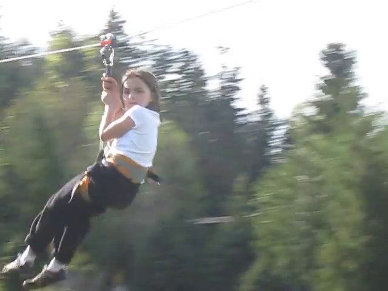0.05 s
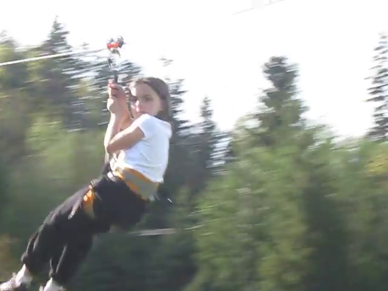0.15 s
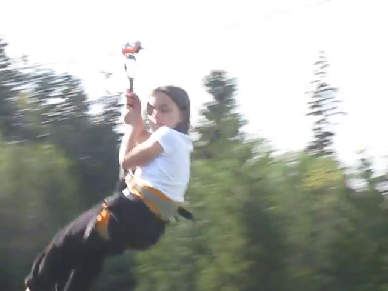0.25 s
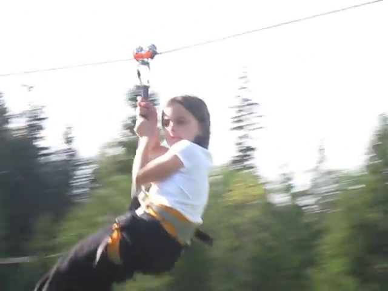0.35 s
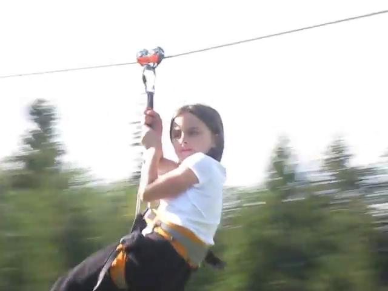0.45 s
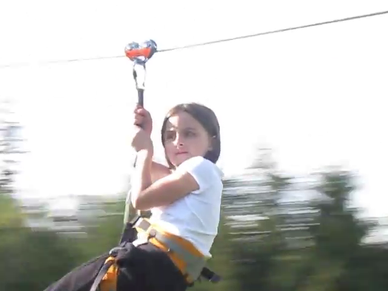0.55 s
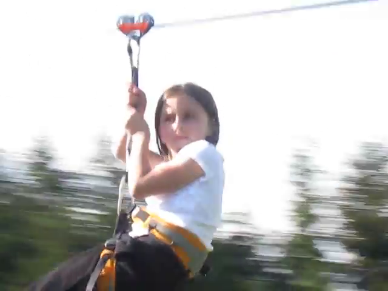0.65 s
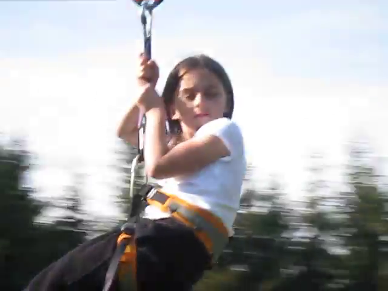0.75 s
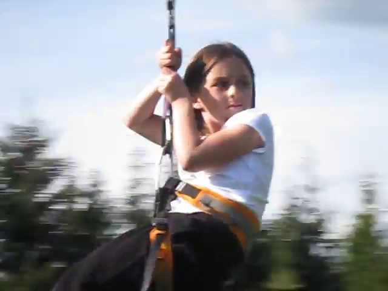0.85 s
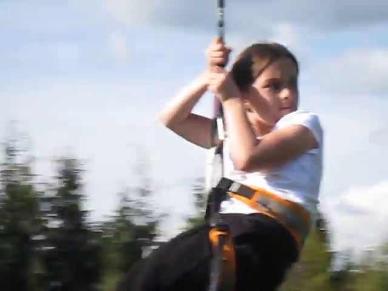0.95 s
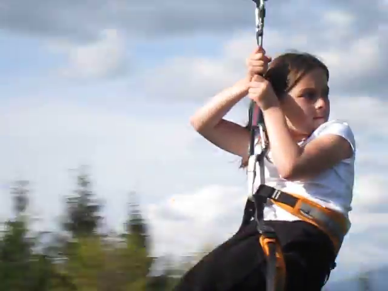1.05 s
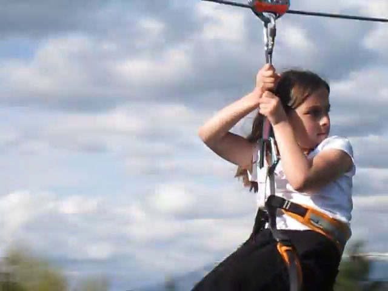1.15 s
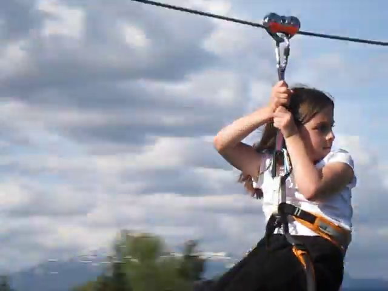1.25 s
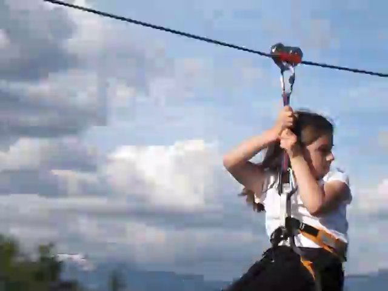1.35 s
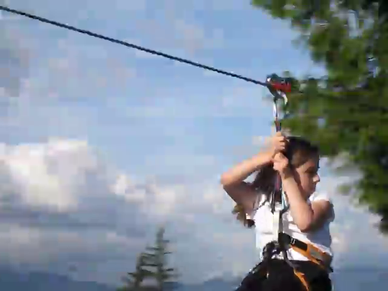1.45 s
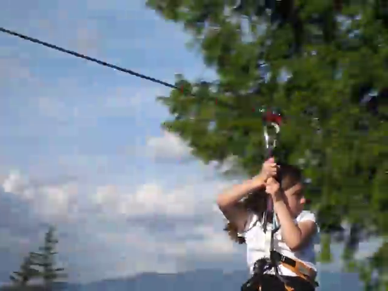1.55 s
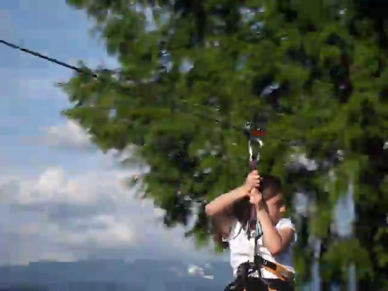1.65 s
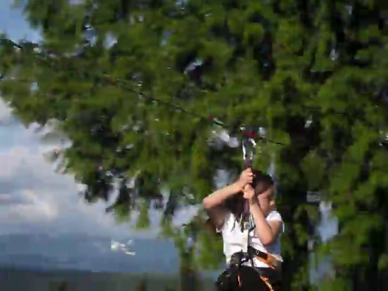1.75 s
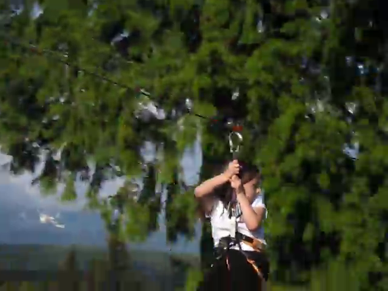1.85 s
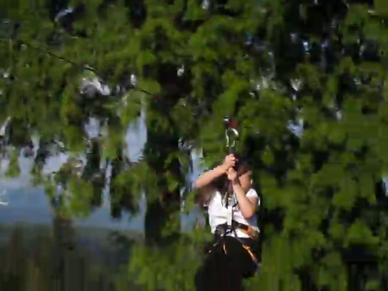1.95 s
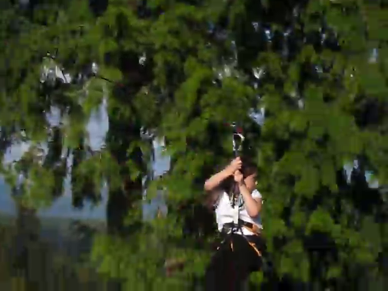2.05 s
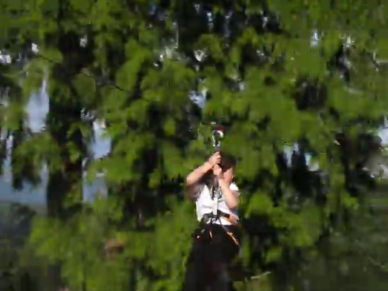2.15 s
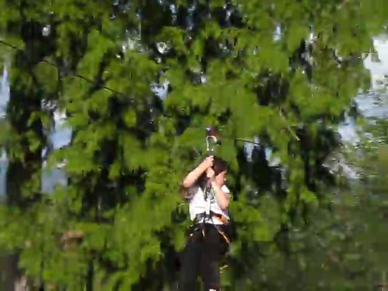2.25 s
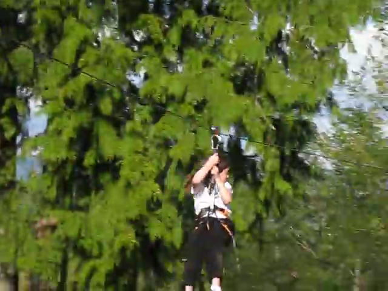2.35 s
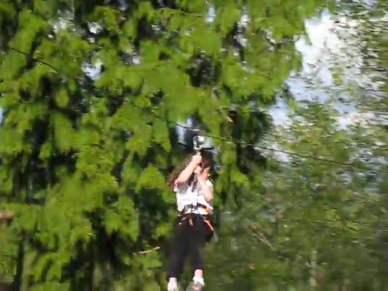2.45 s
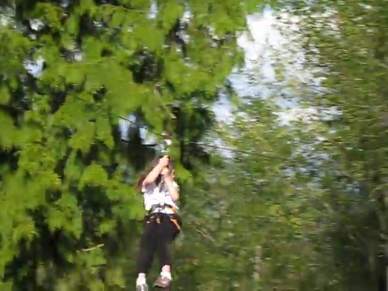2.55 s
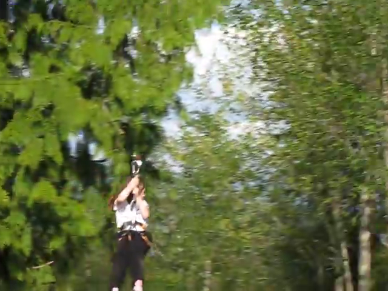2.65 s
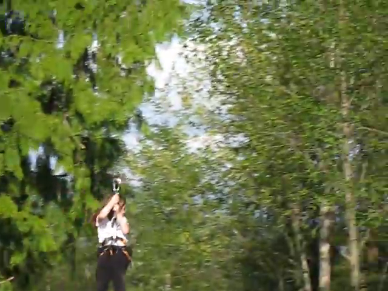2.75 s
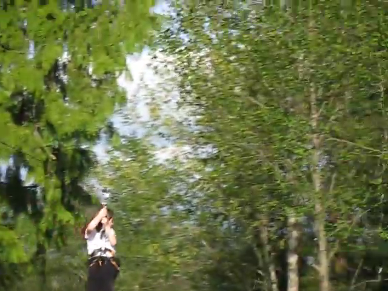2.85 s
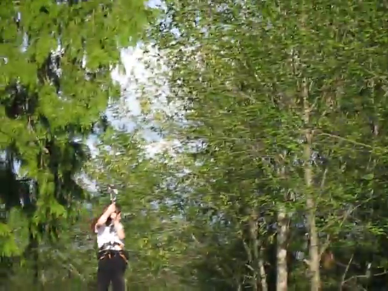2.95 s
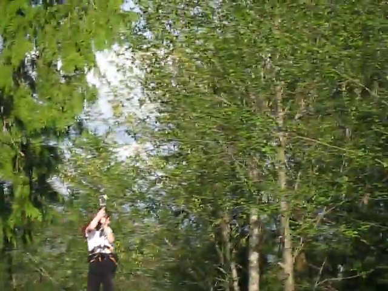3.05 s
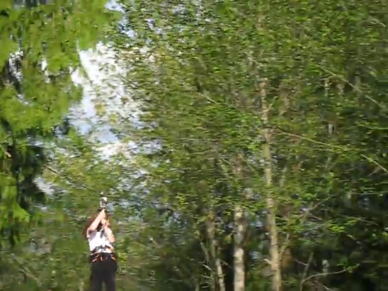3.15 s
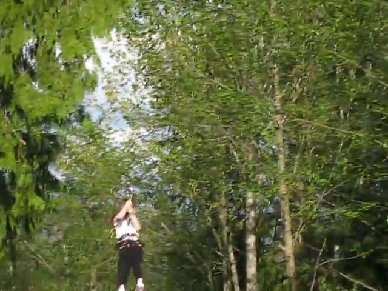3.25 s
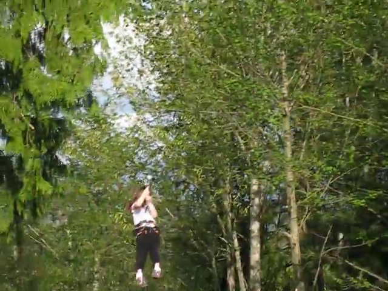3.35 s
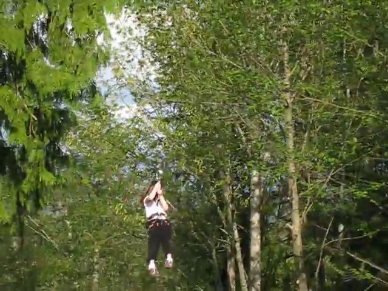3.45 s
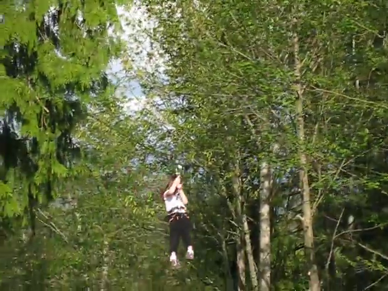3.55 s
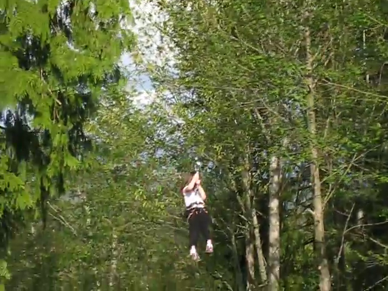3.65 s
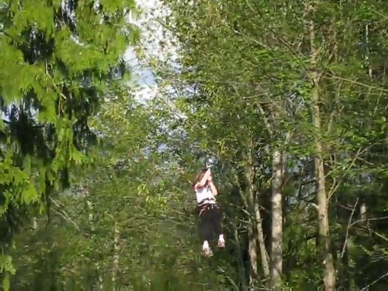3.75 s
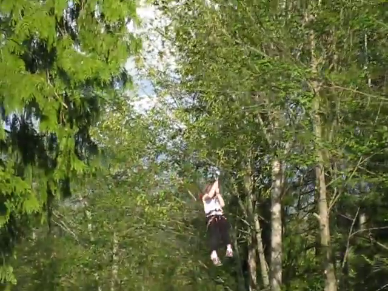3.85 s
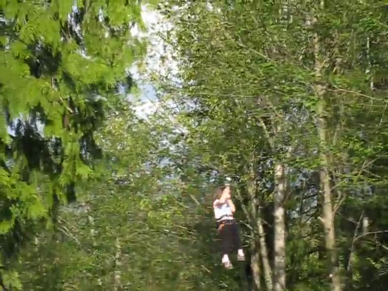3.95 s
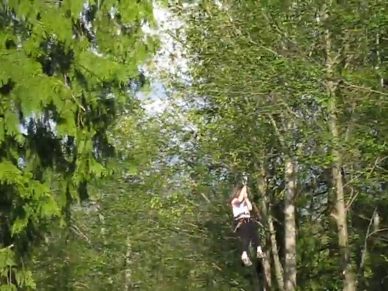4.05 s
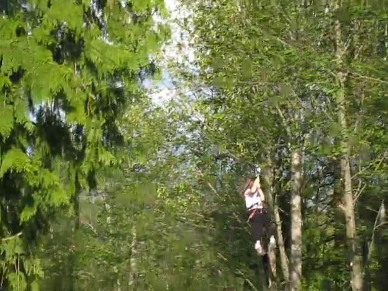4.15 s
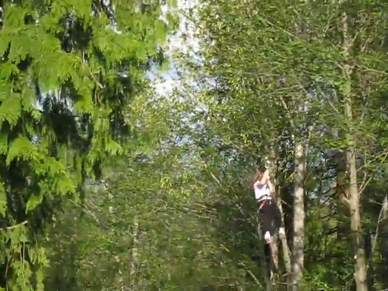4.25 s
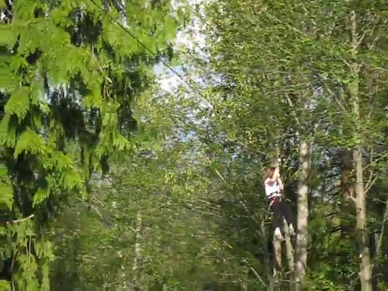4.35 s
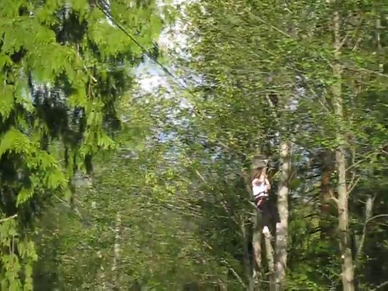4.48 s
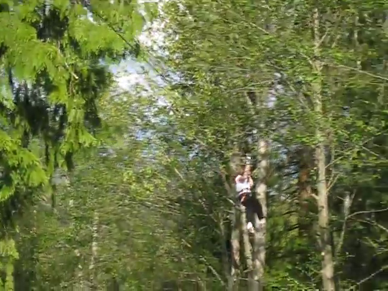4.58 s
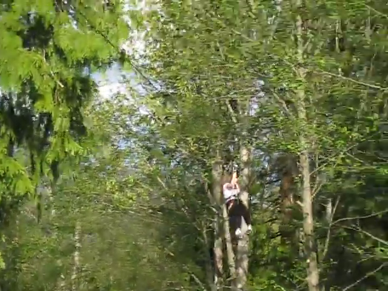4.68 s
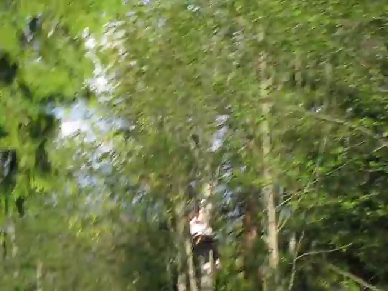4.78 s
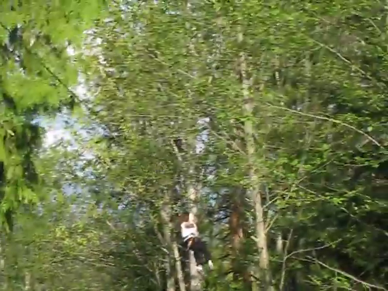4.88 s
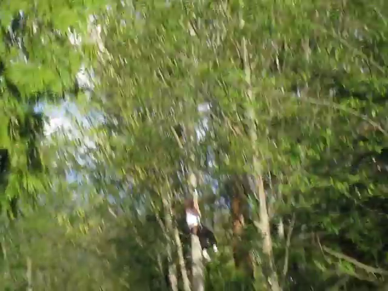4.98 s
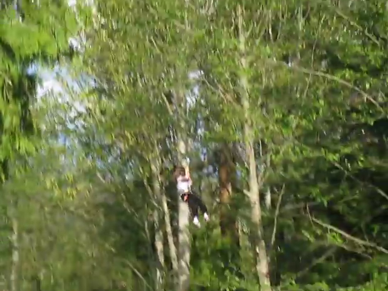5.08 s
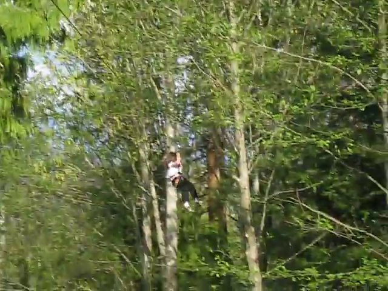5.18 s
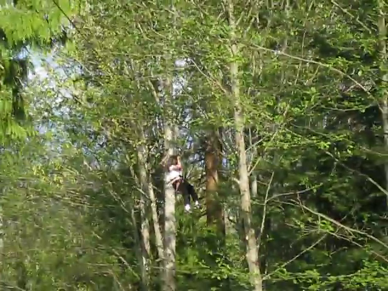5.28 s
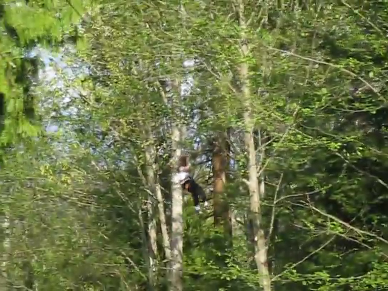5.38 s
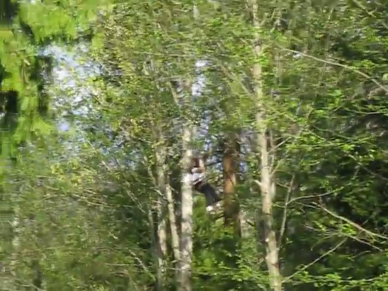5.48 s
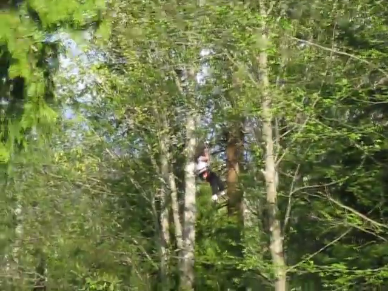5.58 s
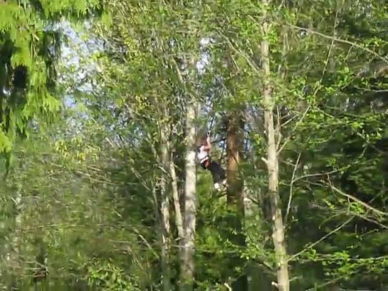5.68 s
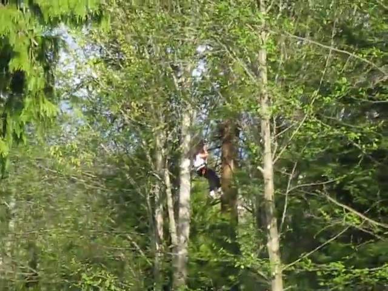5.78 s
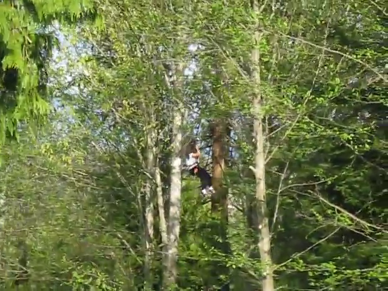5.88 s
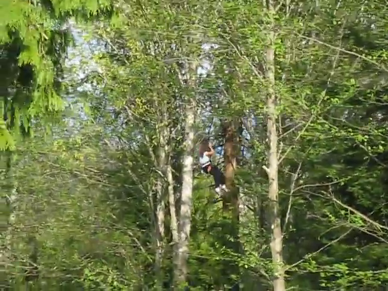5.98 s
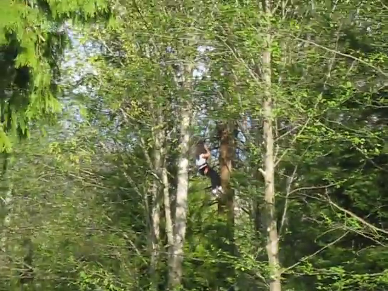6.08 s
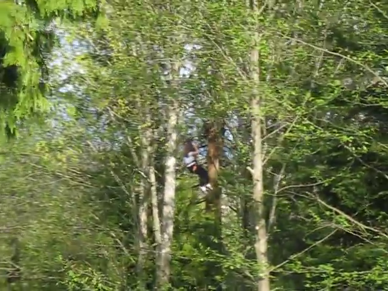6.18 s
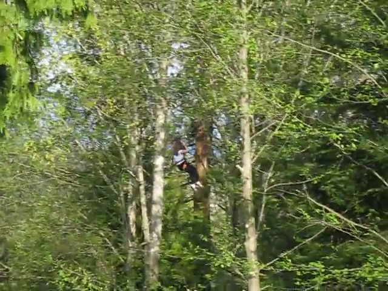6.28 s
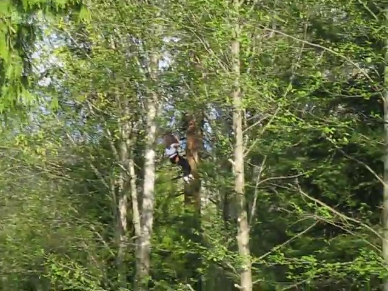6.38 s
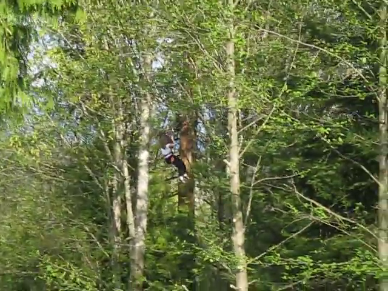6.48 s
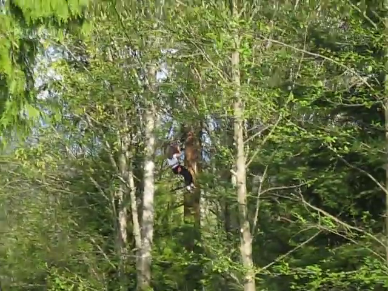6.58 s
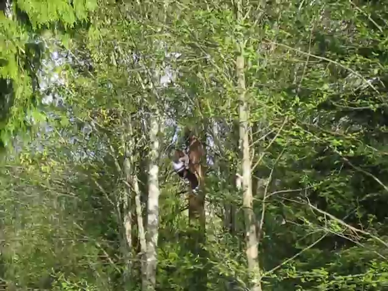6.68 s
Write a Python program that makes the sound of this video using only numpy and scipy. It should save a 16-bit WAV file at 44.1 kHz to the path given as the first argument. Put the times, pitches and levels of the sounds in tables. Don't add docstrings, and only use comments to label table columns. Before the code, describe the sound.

A pulley trolley hisses and whirrs close past on a steel cable, then fades away into rustling woodland with soft wind thumps.

```python
import sys
import numpy as np
from scipy import signal
from scipy.io import wavfile
from scipy.ndimage import map_coordinates

SR = 44100
rng = np.random.default_rng(int(sys.argv[2]) if len(sys.argv) > 2 else 0)


def voltage_ratio(level):
    return 10 ** (np.asarray(level, float) / 20)


def store_wav(level_fs):
    pcm = np.round(np.clip(np.atleast_2d(level_fs), -1, 1) * 32767)
    wavfile.write(sys.argv[1], SR, pcm.T.astype(np.int16))


N = 296352
CLOSEST_S, CLOSEST_M = .98, 4.7
SOUND_M_PER_S = 343


def rms_one(x):
    return x / np.sqrt(np.mean(x ** 2) + 1e-20)


def in_time(rows):
    s, *columns = np.transpose(rows)
    return [np.interp(np.arange(N) / SR, s, c) for c in columns]


def drift(rate):
    r = np.exp(-80 * np.pi * rate / SR)
    white = rng.standard_normal(N // 40 + 2002)
    slow = signal.lfilter([1], [1, -2 * r, r * r], white)[2000:]
    return np.interp(np.arange(N) / 40, np.arange(len(slow)), rms_one(slow))


def bell(t, rise_s, fall_s):
    return np.exp(-(t / np.where(t < 0, rise_s, fall_s)) ** 2)


def swells(rows, rise_s, fall_s):
    s, db = np.transpose(rows)
    coarse = np.arange(0, N + 64, 64)
    shapes = bell(coarse / SR - s[:, None], rise_s, fall_s)
    return np.interp(np.arange(N), coarse, voltage_ratio(db) @ shapes)


def resonance(drive, hz, width_hz, order=1):
    turn = np.exp(2j * np.pi * np.cumsum(hz * np.ones(N)) / SR)
    slow = drive / turn
    for _ in range(order):
        slow = signal.lfilter([1], [1, -np.exp(-np.pi * width_hz / SR)], slow)
    return rms_one((slow * turn).real)


def coloured(white, spectrum, patchy_db):
    out = 0
    edges = 18 * 2 ** np.arange(0, 10.1, 1 / 3)
    hz, level_db = np.transpose(spectrum)
    for k, (low, high) in enumerate(zip(edges, edges[1:])):
        centre_db = np.interp(np.log(low * high) / 2, np.log(hz), level_db)
        if hz[0] <= high and centre_db > -70:
            band_pass = signal.butter(2, [low, high], "band", fs=SR, output="sos")
            band = signal.sosfilt(band_pass, white[k % 2])
            out = out + voltage_ratio(centre_db + patchy_db * drift(2.6)) * band
    return rms_one(out)


# (frequency [Hz], level per Hz [dB])
WOODLAND = [(20, -33), (60, -13), (126, -7.5), (240, -7), (350, -2), (480, -4.5), (700, -3), (1100, -2.5),
            (2000, -6.5), (3500, -9.5), (5400, -9.5), (8000, -46), (12000, -34), (15700, -45)]
# (frequency [Hz], level [dB])
ELECTRONIC_WHINE = [(7851.5, -73), (7881.5, -73)]


def background():
    t = np.arange(N) / SR
    duck_db = -5.5 * bell(t - 0.87, 0.3, 0.3)
    air = voltage_ratio(-48 + duck_db) * coloured(rng.standard_normal((2, N)), WOODLAND, patchy_db=-2.5)
    whine = sum(voltage_ratio(db) * np.sin(2 * np.pi * hz * t) for hz, db in ELECTRONIC_WHINE)
    return air + whine


# (time [s], level [dB])
GUSTS = [
    (0.0, -67),
    (.64, -70),
    (2.25, -73),
    (2.78, -67),
    (2.95, -71),
    (3.44, -70),
    (6.7, -64),
]
# (time [s], peak level [dB], level of upper part [dB], pitch [Hz])
PUFFS = [(0.436, -41, 3, 108), (0.985, -45, -28, 72.7), (1.059, -44, -13, 80.7), (1.669, -44, -17, 99.6),
         (1.775, -40, -21, 37.7), (1.959, -37, -19, 64.1), (1.997, -36, -7, 86.1), (2.036, -42, 0, 75.4),
         (2.483, -37, -1.5, 61.9), (2.57, -38.5, -2, 68.1), (2.658, -41, -23, 67.3),
         (3.719, -53, -11, 46.1)]


def wind():
    white = rng.standard_normal(N)
    low_band = signal.butter(2, [24, 110], "band", fs=SR, output="sos")
    rumble = rms_one(signal.sosfilt(low_band, white))
    gusts = GUSTS + [(s + 0.014, peak_db - 23) for s, peak_db, *_ in PUFFS]
    blowing = voltage_ratio(-70) + swells(gusts, rise_s=0.065, fall_s=0.052)
    out = blowing * voltage_ratio(2.9 * drift(20)) * rumble
    t = np.arange(-.016, .06, 1 / SR)
    phases = rng.uniform(0, 2 * np.pi, (len(PUFFS), 2))
    for (s, peak_db, upper_db, hz), phase in zip(PUFFS, phases):
        low = bell(t, 0.0061, 0.0093) * np.cos(2 * np.pi * hz * t + phase[0])
        upper = bell(t, .0056, .0056) * np.cos(2 * np.pi * 170 * t + phase[1])
        at = round(s * SR)
        out[at:at + len(t)] += voltage_ratio(peak_db - 2.5) * (low + voltage_ratio(upper_db) * upper)
    return out


def motion():
    strand_pitch_m = .0095
    speed = in_time(STRANDS)[0] * strand_pitch_m
    along = np.cumsum(speed) / SR
    along = along - along[round(CLOSEST_S * SR)]
    metres = np.hypot(along, CLOSEST_M)
    return along / metres, metres, 20 * np.log10(metres / CLOSEST_M)


def contact(grain_db, flutter_db):
    sizes = np.minimum(rng.exponential(1, (2, N)), 6)
    ticks = voltage_ratio(grain_db * sizes) * rng.standard_normal((2, N))
    treble = signal.sosfilt(signal.butter(2, 6500, "high", fs=SR, output="sos"), ticks)
    flutter_db = flutter_db * (0.5 * drift(19) + 0.99 * drift(140))
    return (ticks - treble) * voltage_ratio(1.23 * flutter_db) + treble * voltage_ratio(3.1 * flutter_db)


# (frequency [Hz], level [dB])
BEAM_STRENGTH = [(5700, -75), (6000, -54), (6500, -39.5), (7200, -35), (8200, -36), (10000, -33.5),
                 (13000, -39), (16000, -60)]
# (frequency [Hz], level per Hz [dB])
FAR_COLOUR = [(1060, -24), (1800, 1), (2010, -11.5), (2180, 0), (2400, -4), (2730, -7), (3810, 11),
              (4950, 3), (5470, -19.5), (6550, -8), (11200, -15.5), (13900, -19), (15600, -44)]


def cable():
    bearing, metres, spread_db = motion()
    end_on_hz, top_hz = 5700, 17000
    hz = np.minimum(end_on_hz / (np.abs(bearing) ** 1.4 + 1e-9), top_hz)
    beam_db = np.interp(hz, *np.transpose(BEAM_STRENGTH))
    far = (np.abs(bearing) ** 3.77 + voltage_ratio(-25)) * voltage_ratio(-15.0 - 1.986 * spread_db)
    force = contact(grain_db=3.5, flutter_db=-0.5)
    beam = voltage_ratio(beam_db) * resonance(force[0], hz, 2300, order=2)
    return beam + far * coloured(force, FAR_COLOUR, patchy_db=0.8)


# (time [s], level [dB])
ROLL = [(0, -22), (.3, -21.5), (.6, -22.5), (.88, -21.5), (1.05, -21.5), (1.3, -22), (1.55, -22),
        (1.85, -21.5), (2.3, -25.5), (2.7, -28), (3.1, -30.5), (3.63, -30.5), (4.2, -33), (4.9, -35),
        (5.4, -36.5), (5.86, -38), (6.72, -39)]


def follows(near_db, loss_per_db):
    roll_near_db = -21
    return near_db + loss_per_db * (in_time(ROLL)[0] - roll_near_db)


def tugged(white, tugs, level_db, width_hz, swell_s):
    s, hz, slide, tug_db = np.transpose(tugs)
    t = np.arange(N) / SR
    near = np.searchsorted((s[1:] + s[:-1]) / 2, t)
    slide_s = .18
    pitch_hz = hz[near] + slide[near] * np.clip(t - s[near], -slide_s, slide_s)
    gain = voltage_ratio(level_db) + swells(np.transpose([s, tug_db]), swell_s, swell_s)
    return gain * resonance(white, pitch_hz, width_hz, order=2)


# (time [s], pitch [Hz], slide [Hz per s], level [dB])
LOWER_TUGS = [
    (.25, 1083, -120, -45),
    (.66, 1060, -30, -42),
    (.95, 1160, -20, -57),
    (1.36, 1040, 498, -43.5),
    (1.78, 1200, 102, -48),
    (2.2, 1204, 18, -54),
    (5.5, 1102, -20, -68),
]
# (time [s], pitch [Hz], slide [Hz per s], level [dB])
UPPER_TUGS = [
    (.4, 1700, 400, -50),
    (.85, 1584, -150, -37),
    (1.32, 1816, 650, -36),
    (1.8, 1655, 400, -37.5),
    (2.5, 1680, 10, -42),
    (3.3, 1658, 10, -53),
    (3.95, 1670, 10, -52),
    (4.7, 1690, 10, -54),
]


def hanger():
    white = rng.standard_normal((2, N))
    lower = tugged(white[0], LOWER_TUGS, follows(-50, 0.43), width_hz=104, swell_s=0.091)
    upper = tugged(white[1], UPPER_TUGS, follows(-69, 0.41), width_hz=180, swell_s=0.11)
    return lower + upper


# (time [s], strand rate [Hz], whirr level [dB])
STRANDS = [(0, 585.3, -40), (.4, 584.4, -48), (.8, 574.7, -40.5), (1.2, 571, -43.5), (1.6, 560, -48),
           (2.6, 545, -46), (3.5, 528.5, -51), (4.1, 512, -53.5), (4.7, 492, -55.5), (5.3, 455.3, -68),
           (5.6, 432.3, -56), (6, 430.5, -56.5), (6.72, 404.5, -53.5)]
# (time [s], pitch [Hz], slide [Hz per s], level [dB])
HUM_TUGS = [
    (.1, 560, -140, -58),
    (.75, 600, -67, -75),
    (1.38, 600, 200, -52.5),
    (1.75, 577, 174, -62),
    (2.6, 570, -34, -54.5),
]


def strand_whirr():
    hz, whirr_db = in_time(STRANDS)
    white = rng.standard_normal((2, N))
    turn = 2 * np.pi * np.cumsum(hz * (1 + 0.0039 * drift(2.94))) / SR
    even_share = .5
    steady, rough = np.sqrt(2 * even_share), np.sqrt(1 - even_share)
    first = steady * np.sin(turn) + rough * resonance(white[0], hz, 34, order=2)
    second = steady * np.sin(2 * turn) + rough * resonance(white[1], 2 * hz, 50.0, order=2)
    first_db = 0.5 - 7.1 * (1.5 - bell(hz - 535, 55, 55))
    whirr = voltage_ratio(whirr_db) * (voltage_ratio(first_db) * first + second)
    return whirr + tugged(white[1], HUM_TUGS, follows(-49.5, 0.83), width_hz=166, swell_s=0.38)


FACING_S = (.1, .4, .85, 1.3, 1.85, 2.901, 5.5)


def rings(force, modes, lean_db, lean, sway_db):
    out = 0
    for k, (hz, width_hz, side_db) in enumerate(modes):
        b, a = signal.iirpeak(hz, hz / width_hz, fs=SR)
        once = signal.lfilter(b, a, force[k % 2])
        ring = rms_one(signal.lfilter(b, a, once))
        facing_db = np.interp(np.arange(N) / SR, FACING_S, side_db)
        out = out + voltage_ratio(facing_db + lean_db[k] * lean + sway_db * drift(4.6)) * ring
    return out


# (frequency [Hz], level per Hz [dB])
ROLLING = [(330, -44.5), (560, -14.5), (820, -29), (1100, -16), (1700, -7), (2100, -13), (3000, -0.5),
           (4200, -4.5), (5600, -6.5), (8300, -13), (11200, -16.5), (14000, -18.5), (15700, -26)]
# (frequency [Hz], width [Hz], level in each of the seven views [dB])
PLATE_MODES = [(1040, 165, (-26, -15, -11, -9.5, -11.5, -15.5, -7.5)),
               (1432, 210, (-9, -5.5, -5.5, -5, -15, -33, -30)),
               (1701, 160, (-13, -2, -5, -6, -14, -7, -14)),
               (2247, 73, (-22, -21, -18, -6, -21, -11.5, -16)),
               (2877, 210, (-13, 1.5, -9, -16, -5, -8, -4.5)), (3504, 115, (-1, 4.5, 5.5, 8, 0, 1, 1)),
               (3568, 310, (3, -4, 8, -0.5, 3, 3, -3)), (3998, 390, (-19, -12, -18, -19, -0.5, 5.5, 3))]
PLATE_LEAN_DB = (1, 1, 0, 7, -6, 0.5, -1, -5)
# (frequency [Hz], width [Hz], level in each of the seven views [dB])
WHEEL_MODES = [(4900, 230, (2.8, 9.3, 9.8, 7.3, 3.03, 3.3, 4)),
               (4830, 720, (7.3, 13.4, 4.2, 2.3, 5.15, 6.9, 4.9)),
               (6315, 390, (-1.5, 11, -23, -16, -0.5, 5.5, 4.5)),
               (6720, 410, (3.6, 5.5, 1.4, 0.5, 2.7, 1.2, 5.7)), (6900, 830, (0.5, 0, -4, 4.5, 2, 2, 4)),
               (7640, 260, (0, -20, 2, -18, 0.7, -10, -10)), (9400, 950, (2, 3.5, 2.5, 3, 1.5, 1, -1)),
               (10460, 200, (-6, 2, -3.5, -4, -1.5, -6.5, -7)), (4730, 200, (-8, -8, -13, 6, 7, 3, 4)),
               (11920, 250, (-6, -2, -12, -6, -10, -7, -14)), (13260, 450, (-15, 2, -2, -2, -5, -5, -15)),
               (14100, 220, (-10, -12, -9, -7, -6, -3, -14)),
               (14750, 450, (-23, -9, -4, -7, -13, -20, -21))]
WHEEL_LEAN_DB = (-1, -4, -10, -3, 7.5, 4, -3.0, -4.5, 7, -4, -3, -1, -4)


def trolley():
    bearing, metres, spread_db = motion()
    force = contact(grain_db=3.0, flutter_db=0.6)
    rock_period_s, rock_toward_s = 0.63, 1.045
    rock = np.cos(2 * np.pi * (np.arange(N) / SR - rock_toward_s) / rock_period_s)
    lean = rock * (CLOSEST_M / metres) ** 2
    hiss = voltage_ratio(follows(-25.5, 1.41)) * coloured(force, ROLLING, patchy_db=0.6)
    plates = voltage_ratio(follows(-34, 0.95)) * rings(force, PLATE_MODES, PLATE_LEAN_DB, lean, sway_db=0.36)
    wheels = voltage_ratio(follows(-37, 1.5)) * rings(force, WHEEL_MODES, WHEEL_LEAN_DB, lean, sway_db=0.63)
    read = np.arange(N) - (metres - CLOSEST_M) / SOUND_M_PER_S * SR
    ringing = map_coordinates(plates + wheels, [read], order=3, mode="mirror")
    direct = hiss + ringing + strand_whirr() + hanger()
    dull = signal.sosfilt(signal.butter(2, 2200, fs=SR, output="sos"), direct)
    cable_high_m, ear_high_m = 4.0, 1.6
    detour_m = np.sqrt(metres ** 2 + 4 * cable_high_m * ear_high_m) - metres
    echo = np.interp(np.arange(N) - detour_m / SOUND_M_PER_S * SR, np.arange(N), dull)
    both = direct + voltage_ratio(-13 - 2.5 * spread_db) * echo
    return signal.sosfilt(signal.butter(4, 430, "high", fs=SR, output="sos"), both)


def scene():
    mono = background() + wind() + cable() + trolley()
    return np.stack([mono, mono])


def low_pass(x):
    return signal.sosfilt(signal.butter(12, 15750, fs=SR, output="sos"), x)


def record(dry):
    return low_pass(dry)


dry = scene()
out = record(dry)
store_wav(out)
```